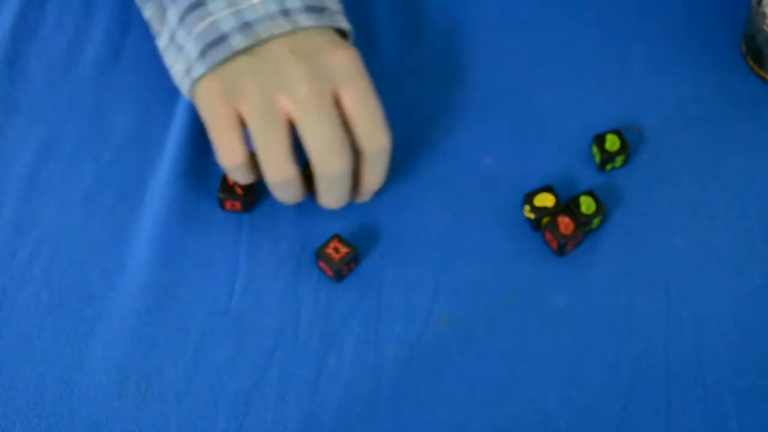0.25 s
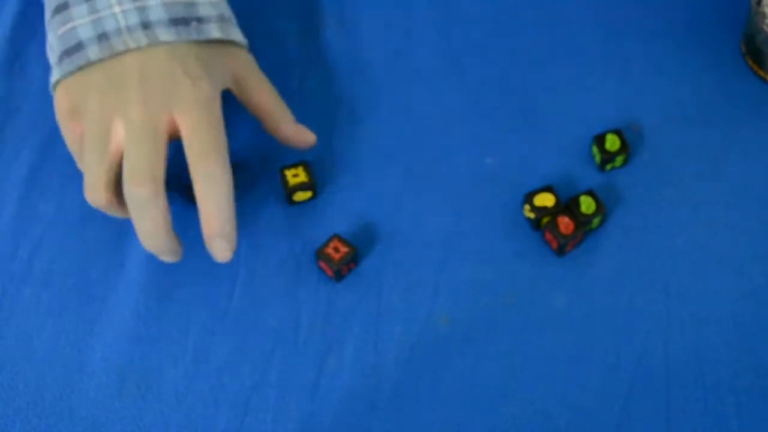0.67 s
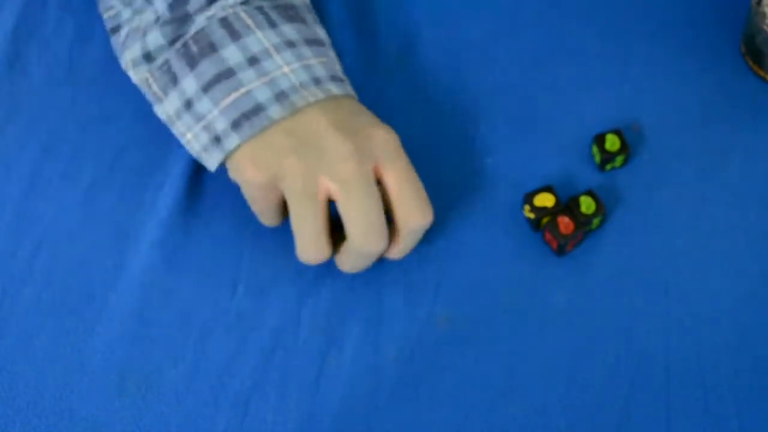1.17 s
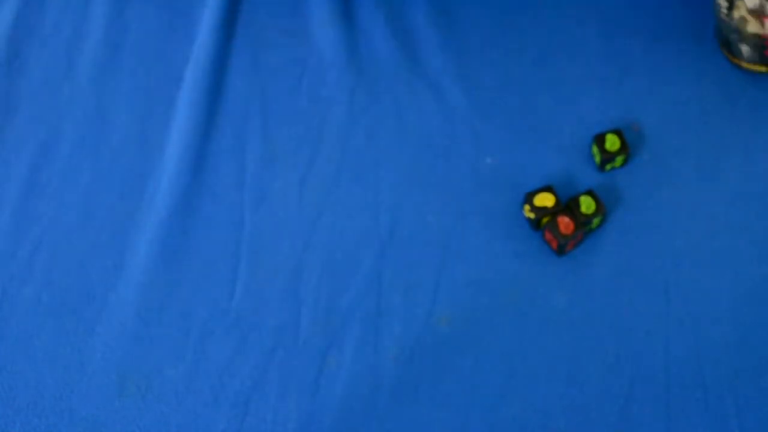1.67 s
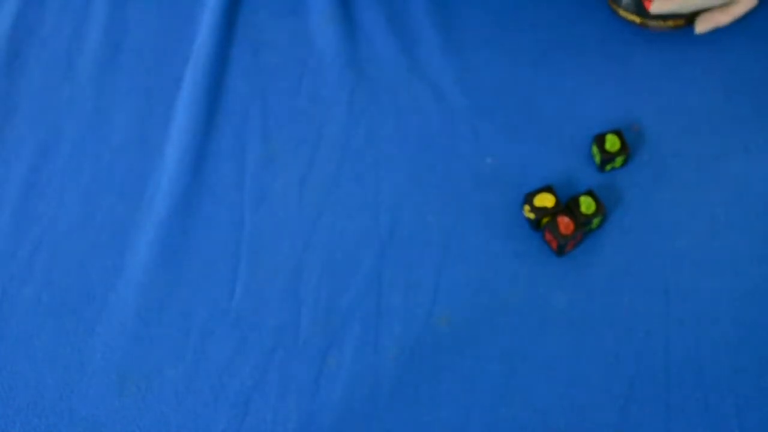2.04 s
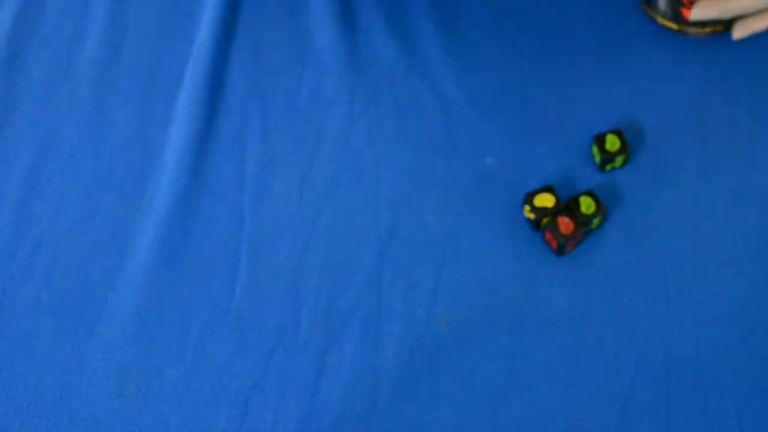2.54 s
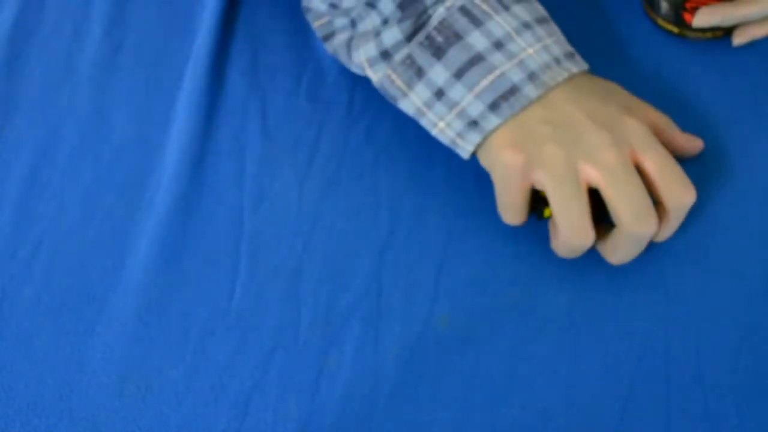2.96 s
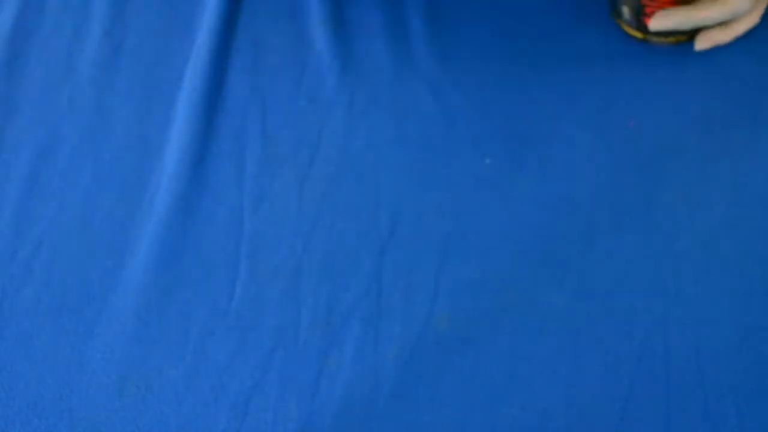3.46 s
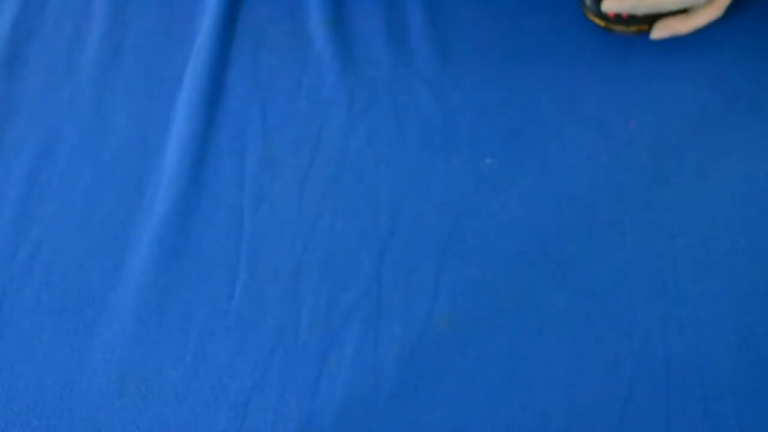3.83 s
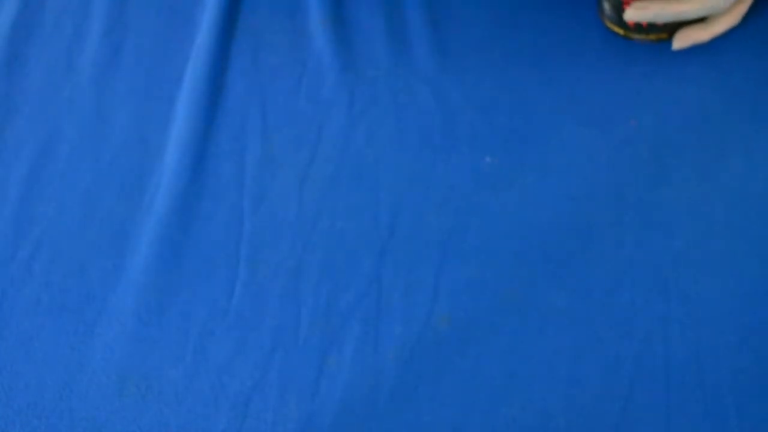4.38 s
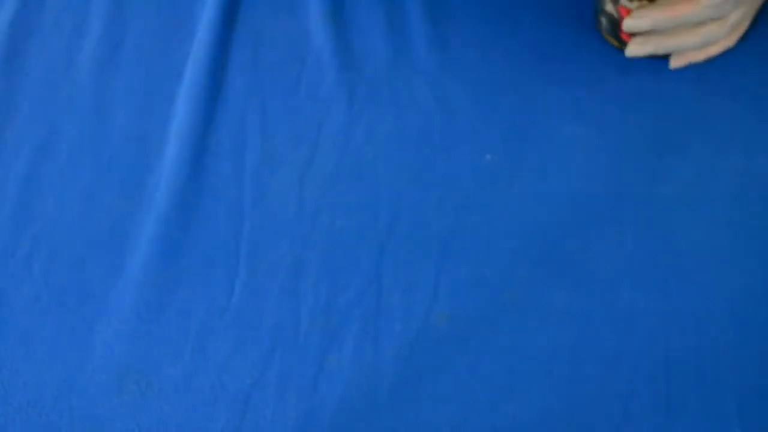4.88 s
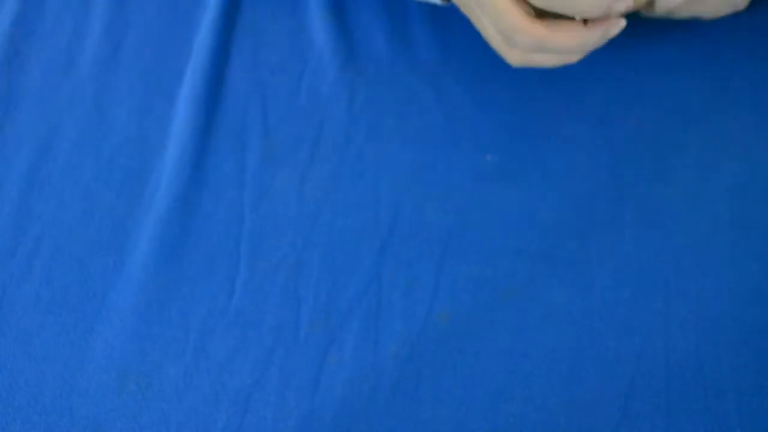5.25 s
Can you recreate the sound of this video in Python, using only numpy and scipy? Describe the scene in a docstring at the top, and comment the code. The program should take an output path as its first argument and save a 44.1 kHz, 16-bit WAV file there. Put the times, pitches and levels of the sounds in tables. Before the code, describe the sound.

In a small quiet room, a sleeve brushes cloth and dice click faintly in the hand. A handful drops into a cardboard cup with a very loud hollow clatter that rattles down quickly. More gathering clicks and a cloth wipe follow, then a second, longer clattering drop. The cup is set down softly, with a few last light ticks. Close microphone, mostly centred, the loudest hits distorting.

```python
"""Dice dropped into a cardboard cup

Dice are gathered by hand from a cloth-covered table and dropped in two handfuls into a cardboard cup.
Each contact is a noise click that rings the cup as decaying sines; its air climbs in pitch as the hand lifts.
A sleeve brushes the cloth as grainy noise, a small room answers, and peaks past full scale clip hard."""
import sys
import numpy as np
from scipy import signal
from scipy.fft import rfft, irfft, next_fast_len
from scipy.io import wavfile
from scipy.ndimage import uniform_filter1d

SR = 44100
rng = np.random.default_rng(int(sys.argv[2]) if len(sys.argv) > 2 else 0)


def persist_wave(psi):
    """Save psi, clipped to +-1, as 16-bit WAV."""
    counts = np.round(np.clip(psi, -1, 1) * 32767).astype(np.int16)
    wavfile.write(sys.argv[1], SR, np.atleast_2d(counts).T)


N = 242842
TIME = np.arange(N) / SR  # s

# Steady room air, its spectrum: f/Hz, level/dB
HUSH_SPECTRUM = [(15, -49), (25, -26), (59, -16.5), (133, -8), (156, -2), (276, -4), (342, -5.5),
                 (460, -6.5), (1010, -11.5), (1250, -12.5), (1820, -16), (3300, -23), (15800, -40)]
# Stereo width of the room air: f/Hz, side over mid/dB
HUSH_WIDTH = [(60, -14.5), (240, -17), (950, -4.5), (3770, -1.5), (15000, 1.5)]
# Decay of the room tail: f/Hz, t60/s
ROOM_DECAY = [(300, 0.1), (800, 0.42), (2000, 0.26), (5500, 0.3), (12000, 0.099)]
# Stereo width of the room tail: f/Hz, side over mid/dB
ROOM_WIDTH = [(500, -22.5), (2500, -31), (5000, -19), (12000, -5.5)]
# Sleeve strokes, cloth on cloth: middle t/s, length/s, level/dB
SLEEVE_STROKES = [(.23, 0.31, -52.5), (1.27, 0.62, -54), (1.7, 0.13, -52), (2.06, 0.16, -55.5),
                  (2.32, 0.093, -59), (3.12, 0.36, -51.5), (3.6, 0.295, -64), (4.65, 0.27, -63),
                  (5.24, 0.2, -46.5)]
# The hand wipes off the table: middle t/s, length/s, level/dB
WIPE_STROKES = [(3.465, 0.093, -36)]
# A finger slides on the cup: middle t/s, length/s, level/dB
SQUEAK_STROKES = [(1.7, .14, -60), (2.07, .1, -66)]
# Colour of the sleeve strokes: f/Hz, level/dB
SLEEVE_SPECTRUM = [(410, -27), (700, -41.5), (747, 3.5), (873, -2), (1730, 4.5), (2950, -8), (3070, -7),
                   (10900, -13.5), (15500, -38)]
# Colour of the hand's wipe: f/Hz, level/dB
WIPE_SPECTRUM = [(410, -30), (700, -15), (993, -5.5), (1580, -1.5), (1710, -6.5), (3970, -2.5), (4350, -8),
                 (8880, -13), (15500, -30)]
# The cup is set down: t/s, rim level/dB, table level/dB
SET_DOWNS = [(4.578, -43, -62), (4.594, -68, -31.5)]
# Modes of the cup rim: f/Hz, level/dB, t60/s
RIM_MODES = [(1628, 11, 0.095), (1703, 4.5, .09), (1810, -1, .05)]
# Modes of the padded table: f/Hz, level/dB, t60/s
TABLE_MODES = [(123, -9, 0.1), (185.4, 0.5, 0.043), (380, 10, 0.03), (571, 13, 0.021)]
# Dice touching in the hand: t/s, level/dB, dull part over it/dB (each part has a further fixed trim)
HAND_CONTACTS = [(1.0496, -35, -6), (1.0542, -32, -19.5), (1.075, -39, -4.5), (1.1455, -37.5, -14.5),
                 (1.953, -51, -6), (2.0225, -50, 5), (2.0243, -44.5, -6), (2.0314, -50.5, 1.5),
                 (2.3317, -24, -17.5), (2.915, -44.5, -14), (3.025, -48.5, -19), (3.085, -32.5, -14.5),
                 (3.0975, -36, -18), (3.1132, -21.5, -22.5), (3.1158, -23, -36), (3.133, -31.5, -13),
                 (3.362, -43, -4.5), (3.3645, -48.5, -0.5), (4.5501, -55.5, -4), (4.5825, -57, 3),
                 (4.5961, -55, 2), (5.1961, -22, -25), (5.3667, -55.5, 4), (5.3874, -46.5, 1)]
# Loose dice tumble on after a drop and settle: t/s, level/dB, t60/s
TUMBLES = [(2.44, -27, .7), (3.74, -37.5, .3), (3.95, -45, .2), (4.09, -30.5, .4), (4.19, -29, .5),
           (4.36, -39.5, .4)]
# Clear blows of dice on the cup or each other inside it: t/s, level/dB, air over it/dB
CUP_BLOWS = [(1.86, -37, 3.5), (1.8652, -37.5, 8), (2.3875, -36, 3.5), (2.4082, -23.5, -6.5),
             (2.417, 5.5, -6.5), (2.4309, 2, -7), (2.4404, -4, 0), (2.4618, -12, -13.5),
             (2.4705, -15.5, 9.5), (2.4935, -14, -9), (2.4979, -17.5, -6.5), (2.5162, -13, -21),
             (2.5285, -11.5, -1.5), (2.5443, -22.5, 9), (2.5532, -15, -4.5), (2.5862, -15.5, -2),
             (2.5637, -22, -15), (2.5961, -24.5, -12), (2.7218, -15.5, 4.5), (2.7638, -32, 8.5),
             (3.7284, -13, -13.5), (3.7345, -23, 4), (3.7667, -23.5, -10.5), (3.831, -34, -6.5),
             (3.8916, -45.5, -6), (3.9438, -17.5, -7), (3.9508, -36, 0.5), (4.0796, -5, -4.5),
             (4.1009, -13.5, 3.5), (4.1177, -19, -18.5), (4.1385, 2, -5.5), (4.1498, 0, -7.5),
             (4.1856, -6, -3), (4.1897, -7.5, 4.5), (4.2231, -4, 0), (4.2288, -17, 10.5),
             (4.2518, -18.5, -11), (4.2606, -17.5, 4.5), (4.2699, -24, 14.5), (4.2885, -16.5, -13.5),
             (4.3498, -14, -13.5), (4.354, -12, -1), (4.3636, -10.5, -5.5), (4.4056, -24, -17),
             (4.4437, -33.5, 6.5), (5.1624, -31, -5.5), (5.1956, -16, -8.5), (5.2109, -28.5, -15.5),
             (5.2576, -35.5, -1), (5.3071, -36, -6), (5.3246, -51.5, 9.5), (5.4695, -37, -0.5),
             (5.4964, -41.5, 6)]
# Resin on resin, colour of the click: f/Hz, level/dB
CLICK_SPECTRUM = [(1470, -45.5), (2500, -1), (2890, 1), (3510, 0.5), (4000, -1.5), (4560, 0), (5280, -6.5),
                  (10000, -7), (15800, -27.5)]
# Modes of the cup wall, before each blow shifts them: f/Hz, level/dB, t60/s
WALL_MODES = [(1736, -11, 0.017), (1855, 6, 0.031), (1979, 7.5, 0.042), (2082, 6.5, 0.018),
              (2151, 6.5, 0.024), (2356, 2.5, 0.034), (2517, 5, 0.016), (2670, -20.5, 0.042),
              (3406, -2.5, 0.02)]
# Modes of the cup base, before each blow shifts them: f/Hz, level/dB, t60/s
BASE_MODES = [(470, -17, 0.017), (882, -1.5, 0.055), (943, -2, 0.029), (1016, 7.5, 0.025),
              (1155.6, 1, 0.04), (1303, 0.5, 0.038), (1380, -4.5, 0.016)]
# Air in the cup, two quick modes and a lingering one: multiple of the air pitch, level/dB, t60/s
AIR_MODES = [(1, 5.5, 0.068), (.94, -7.5, 0.066), (1.02, -22, .45)]
# The hand lifts off the mouth: t/s, length/s
HAND_LIFTS = [(2.378, .19), (4.04, .36)]

HUSH_DB = -52.5  # rms of its mid
TOP_HZ = 15900  # band limit
ENDS_DB, ARCH = 8.5, 2.6  # a stroke is this much weaker at its ends; larger arch, flatter top
SQUEAK_HZ = 3510  # centre of the squeak band
TICK_DB, WALL_DB, BASE_DB = 10.5, -10, -7.5  # parts of every cup blow, over its level
SPOT = .03  # spread of the share by which the struck spot shifts wall and base pitch
COVERED_HZ, OPEN_HZ = 672.6, 779  # air pitch under the hand and free
OPEN_S = .5  # how long the mouth stays free after a lift
# One die rocks to rest, its gaps closing in on the last
ROCK_S, FIRST_GAP_S, LAST_GAP_S, QUICKEN = 2.6216, .023, .0086, .58  # QUICKEN: ratio per tap
ROCK_DB, ROCK_AIR_DB, ROCK_LOSS_DB = -21, -2.5, 2.4  # level of the first tap, air over it, loss a tap


def amp(db):
    """Gain of a level in dB."""
    return 10 ** (np.asarray(db) / 20)


def unit(x):
    """x at rms 1."""
    return x / np.sqrt(np.mean(x ** 2) + 1e-20)


def along(points, hz):
    """Read (f/Hz, value) points on a log frequency axis."""
    f, value = np.transpose(points)
    return np.interp(np.log(hz + 1), np.log(f + 1), value)


def filtered(x, response):
    """x times a response of frequency."""
    size = next_fast_len(x.shape[-1] + 4096)
    hz = np.fft.rfftfreq(size, 1 / SR)
    return irfft(rfft(x, size) * response(hz), size)[..., :x.shape[-1]]


def coloured(x, spectrum):
    """x shaped by (f/Hz, level/dB) points."""
    return filtered(x, lambda hz: amp(along(spectrum, hz)))


def add(out, s, sound):
    """Mix a sound in at s seconds."""
    part = out[..., round(s * SR):][..., :sound.shape[-1]]
    part += sound[..., :part.shape[-1]]


def mix(*sounds):
    """Sum of sounds that start together."""
    out = np.zeros(max(map(len, sounds)))
    for sound in sounds:
        add(out, 0, sound)
    return out


def hush():
    """The steady air of the room: coloured noise, its side shaped again for width."""
    mid, side = coloured(rng.standard_normal((2, N)), HUSH_SPECTRUM)
    side = coloured(side, HUSH_WIDTH)
    return amp(HUSH_DB) * np.array([mid, side]) / np.std(mid)


def room(sound, wet_db):
    """Direct sound plus a fresh tail, as mid and side; each frequency dies at its own speed."""
    length = SR // 3
    hz, t, noise = signal.stft(rng.standard_normal((2, length)), SR, nperseg=256)
    late = amp(-60 * t / along(ROOM_DECAY, hz)[:, None])
    early = amp(6.0 - 60 * t / 0.036)  # table and near walls answer first
    noise = noise * (late + early)
    noise[1] *= amp(along(ROOM_WIDTH, hz))[:, None]
    tail = signal.istft(noise, SR, nperseg=256)[1][:, :length]
    tail = tail * amp(wet_db) / np.linalg.norm(tail[0])
    tail = np.pad(tail, ((0, 0), (round(.0045 * SR), 0)))  # 4.5 ms before the room answers
    tail[:, 0] = 1, amp(-38.0)  # direct sound, almost all mid
    return signal.fftconvolve(sound[None], tail, axes=1)


def level(strokes):
    """Gain per sample of strokes that swell and fade."""
    return sum(amp(db - ENDS_DB * np.abs(2 * (TIME - s) / length) ** ARCH) for s, length, db in strokes)


def cloth(strokes, spectrum, grain_db, side_db):
    """Fibres catch and let go: noise in uneven grains."""
    unevenness = unit(uniform_filter1d(rng.standard_normal(N), size=40))
    grain = amp(grain_db * unevenness)
    noise = coloured(grain * rng.standard_normal((2, N)), spectrum)
    return level(strokes) * unit(noise) * amp([[0], [side_db]])


def sleeve():
    """The sleeve brushes cloth on cloth, nearly in the centre."""
    return cloth(SLEEVE_STROKES, SLEEVE_SPECTRUM, grain_db=1.0, side_db=-21.5)


def wipe():
    """The hand wipes off the table, a wider stroke of grainy noise."""
    return cloth(WIPE_STROKES, WIPE_SPECTRUM, grain_db=1, side_db=-6.5)


def squeak():
    """A finger slides on the cup: grainy noise in a narrow band."""
    band = [(SQUEAK_HZ - 450, -30), (SQUEAK_HZ, 0), (SQUEAK_HZ + 450, -30)]
    return cloth(SQUEAK_STROKES, band, grain_db=2.5, side_db=-14.5)


def ring(modes, attack, scatter_db, scale=1):
    """One blow on a set of modes, at new strengths and slightly new pitches; attack in s."""
    hz, db, t60 = np.transpose(modes)[:, :, None]
    t = np.arange(min(round(t60.max() * SR), SR // 3)) / SR
    strength, detune = rng.standard_normal((2, len(modes), 1))
    pitch = hz * scale * (1 + 0.0151 * detune)
    decay = amp(db + scatter_db * strength - 60 * t / t60)
    waves = decay * np.sin(2 * np.pi * pitch * t)
    return waves.sum(0) * (1 - np.exp(-t / attack))


def click(t60, spectrum):
    """Two hard faces meet: one sharp spike amid a short chatter of noise."""
    t = np.arange(SR // 40) / SR
    spike_s = .001
    sound = amp(-5 - 60 * abs(t - spike_s) / t60) * rng.standard_normal(len(t))
    sound[round(spike_s * SR)] += 1.8
    return coloured(sound, spectrum)


def knock():
    """The rim pings, then the base meets the padded table."""
    out = np.zeros((2, N))
    for s, rim_db, table_db in SET_DOWNS:
        rim = amp(rim_db) * ring(RIM_MODES, attack=.006, scatter_db=0)
        table = amp(table_db) * ring(TABLE_MODES, attack=.004, scatter_db=1.5)
        add(out, s, room(mix(rim, table), wet_db=-3))
    return out


def hand():
    """Fingers damp the dice: a click and a dull tick, no ring."""
    crisp_spectrum = [(2500, -23), (4800, 8.5), (8000, 11.0), (11000, 3.5), (15800, -23.5)]  # f/Hz, level/dB
    dull_spectrum = [(900, -3), (1700, -2.0), (3200, -1), (5000, -7), (9000, -32.5)]
    out = np.zeros((2, N))
    for s, db, dull_db in HAND_CONTACTS:
        crisp = amp(0.5) * click(t60=0.00047, spectrum=crisp_spectrum)
        dull = amp(dull_db + 19.5) * click(t60=0.021, spectrum=dull_spectrum)
        add(out, s, amp(db) * room(crisp + dull, wet_db=-3.5))
    return out


def air_hz(s):
    """The air column sings higher while its mouth is free."""
    free = sum(np.clip((s - lift) / length, 0, 1) * (s < lift + length + OPEN_S)
               for lift, length in HAND_LIFTS)
    return COVERED_HZ + (OPEN_HZ - COVERED_HZ) * free


def tumble():
    """Many light contacts at random moments, a few much stronger than the rest, ring the cup as they fade."""
    out = np.zeros((2, N))
    t = np.arange(SR // 2) / SR
    for s, db, t60 in TUMBLES:
        strength = amp(3.94 * rng.exponential(size=len(t)))
        struck = rng.random(len(t)) < 350 / SR  # 350 contacts a second on average
        sign = rng.choice([-1, 1], len(t))
        taps = unit(strength * struck * sign) * amp(db - 60 * t / t60)
        wall = amp(-21) * ring(WALL_MODES, attack=0.00062, scatter_db=5)
        base = amp(-14) * ring(BASE_MODES, attack=0.0015, scatter_db=4)
        air = amp(-19) * ring(AIR_MODES, attack=0.009, scatter_db=1.1, scale=air_hz(s + 0.062))
        ticks = amp(5.0) * coloured(taps, CLICK_SPECTRUM)
        ringing = signal.fftconvolve(taps, mix(wall, base, air))
        add(out, s, room(mix(ticks, ringing), wet_db=-3.5))
    return out


def rocking(count=8):
    """Taps that come ever faster and weaker, as rows like those of the cup blows."""
    gaps = LAST_GAP_S + (FIRST_GAP_S - LAST_GAP_S) * QUICKEN ** np.arange(count)
    times = ROCK_S + np.cumsum(gaps) - gaps
    return [(s, ROCK_DB - ROCK_LOSS_DB * n, ROCK_AIR_DB) for n, s in enumerate(times)]


def cup():
    """Each contact clicks, knocks wall and base, and sets the slower air column going."""
    out = np.zeros((2, N))
    for s, db, air_db in CUP_BLOWS + rocking():
        wall_spot, base_spot = 1 + SPOT * rng.standard_normal(2)
        wall = amp(WALL_DB) * ring(WALL_MODES, attack=0.00098, scatter_db=3.5, scale=wall_spot)
        base = amp(BASE_DB) * ring(BASE_MODES, attack=0.0022, scatter_db=3.0, scale=base_spot)
        air = amp(air_db) * ring(AIR_MODES, attack=0.0043, scatter_db=0.5, scale=air_hz(s))
        tick = amp(TICK_DB) * click(t60=.007, spectrum=CLICK_SPECTRUM)
        add(out, s, amp(db) * room(mix(tick, wall, base, air), wet_db=-3.0))
    return out


def scene():
    """Mid and side of all sources, turned into left and right."""
    rubbing = sleeve() + wipe() + squeak()
    mid, side = hush() + rubbing + knock() + hand() + tumble() + cup()
    return np.array([mid + side, mid - side])


def record(dry):
    """The input clips hard at full scale; nothing is kept above the band limit."""
    return filtered(np.clip(dry, -1, 1), lambda hz: hz < TOP_HZ)


dry = scene()
out = record(dry)
persist_wave(out)
```